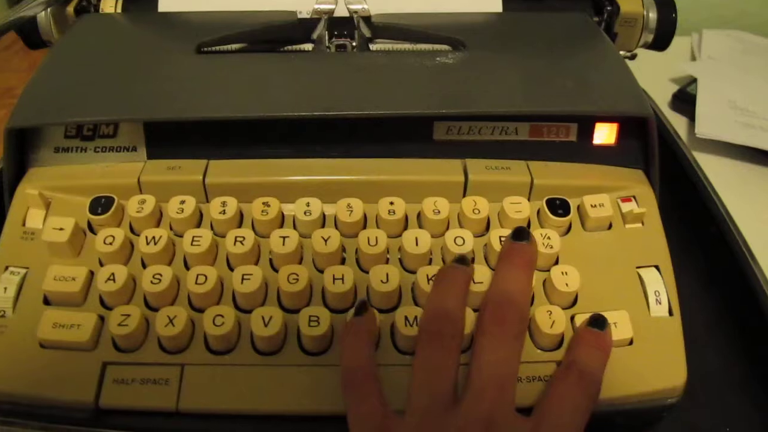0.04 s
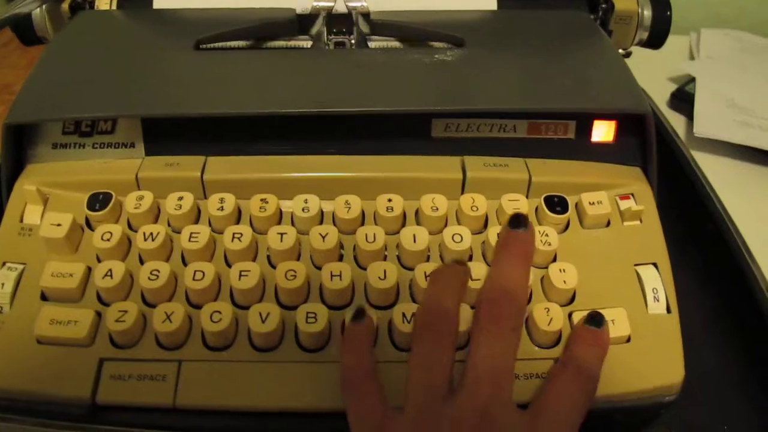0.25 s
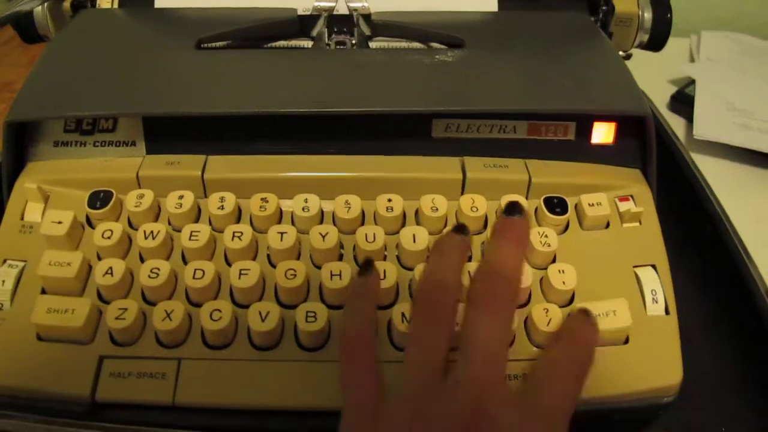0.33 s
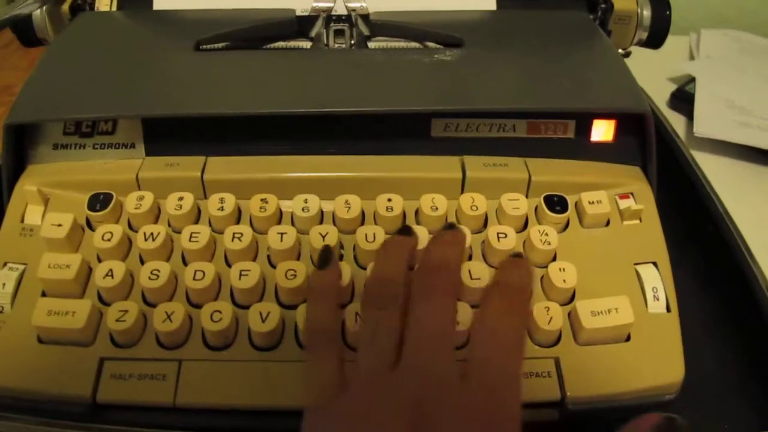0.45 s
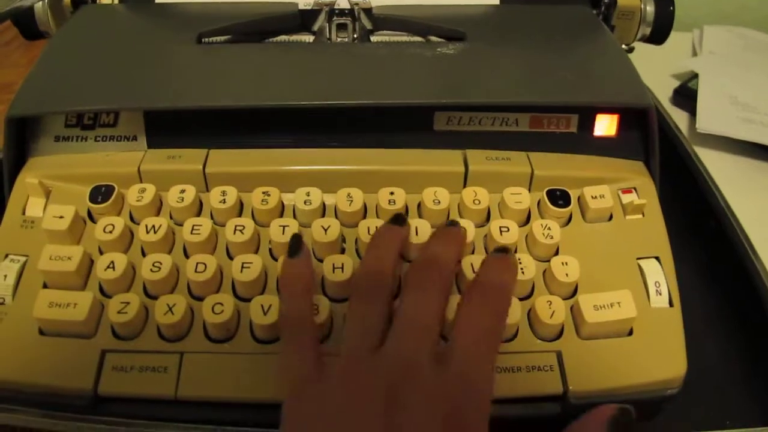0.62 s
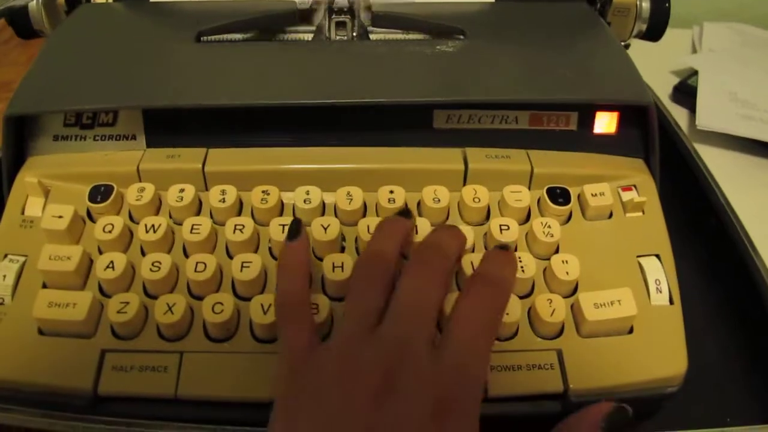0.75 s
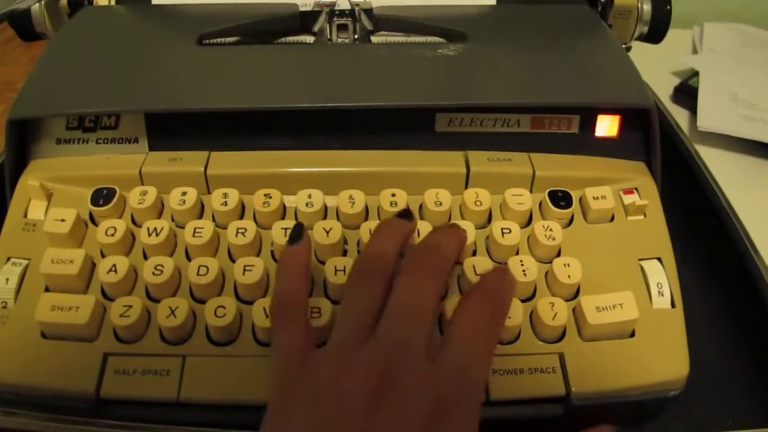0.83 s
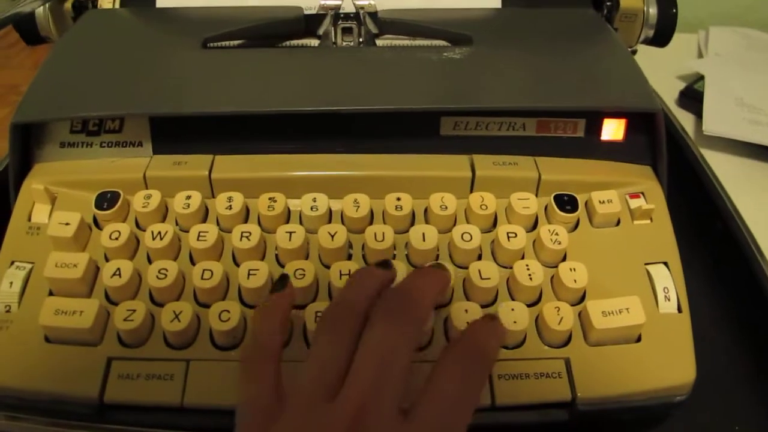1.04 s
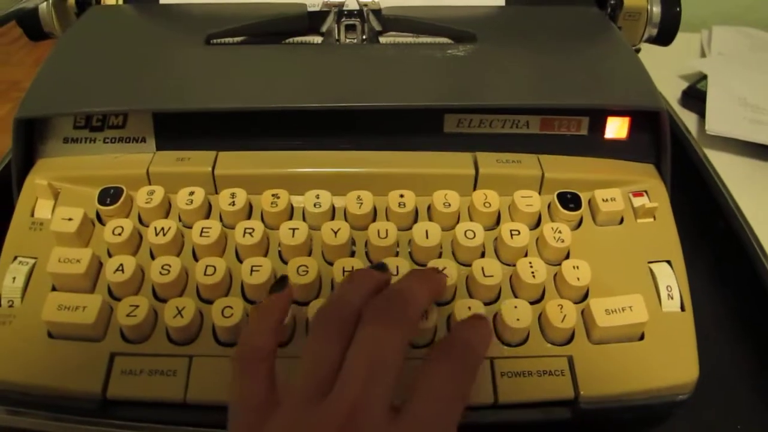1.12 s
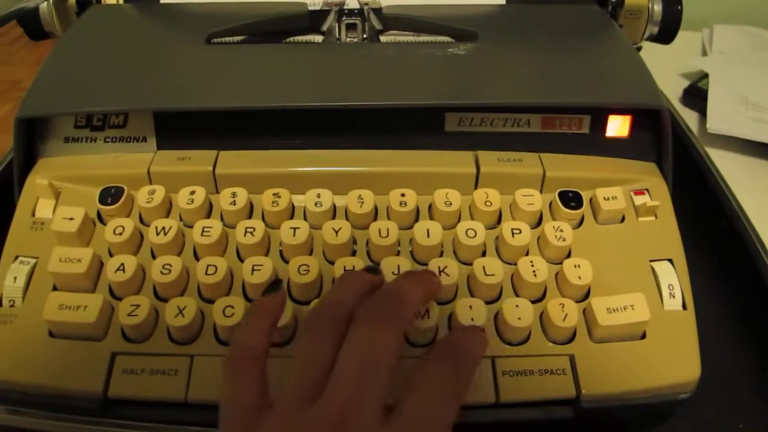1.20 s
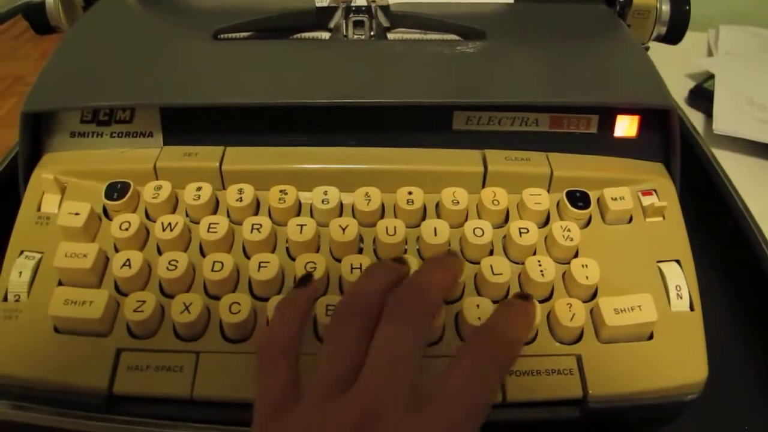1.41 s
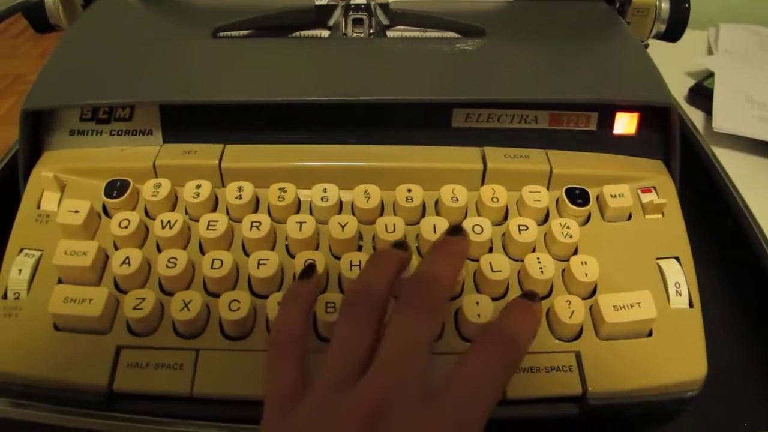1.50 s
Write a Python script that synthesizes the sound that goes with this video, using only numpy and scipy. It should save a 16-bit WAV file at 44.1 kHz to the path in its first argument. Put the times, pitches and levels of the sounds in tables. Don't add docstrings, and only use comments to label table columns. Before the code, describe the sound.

An electric typewriter hums as two letters crack sharply with a duller space bar clunk between

```python
import sys
import numpy as np
from scipy import signal
from scipy.fft import rfft, irfft
from scipy.io import wavfile
from scipy.ndimage import map_coordinates

SR = 44100
rng = np.random.default_rng(int(sys.argv[2]) if len(sys.argv) > 2 else 0)


def gain_from_db(level_db):
    decades = np.asarray(level_db, float) / 20
    return 10 ** decades


def transcribe(signal):
    frames = np.atleast_2d(signal).T
    limited = np.clip(frames, -1, 1)
    pcm = np.round(limited * 32767).astype(np.int16)
    wavfile.write(sys.argv[1], SR, pcm)


N = 68355

# (time [s], level [dB])
STRIKES = [
    (0.234, -1.5),
    (0.7613, -3),
]
# (frequency [Hz], level [dB], t60 [s])
FIRST_SLUG = [(894, -35.5, 0.021), (1850, -26.5, 0.011), (2540, -21, 0.0033), (3240, -14.5, 0.0051),
              (4620, -2.5, 0.0069), (5040, 0.5, 0.005), (5720, 1, 0.0074), (6730, -6, 0.0047),
              (7800, -6.5, 0.011), (9200, -14, .004), (12500, -14.5, 0.0033)]
# (frequency [Hz], level [dB], t60 [s])
SECOND_SLUG = [(881, -29.5, .02), (1800, -21, .012), (2450, -16.5, 0.01), (3510, -13, .006),
               (4500, -3, 0.0081), (4930, -4, 0.0078), (5440, -0.5, .007), (6370, -2.5, .006),
               (7720, -10.5, 0.013), (10600, -29, .004)]
SECOND_TOUCH_S, SECOND_TOUCH_DB = .001, -9.5
BOUNCE_S, BOUNCE_DB = .0074, -13.5
SLUG_LOW_HZ, BOUNCE_TOP_HZ = 700, 10000
SLUG_CONTACTS, SLUG_SPAN_S, BOUNCE_SPAN_S = 2, .0004, .0012


def type_bars():
    thin = signal.butter(2, SLUG_LOW_HZ, "high", fs=SR, output="sos")
    soft = signal.butter(4, BOUNCE_TOP_HZ, fs=SR, output="sos")
    out = np.zeros((2, N))
    for (s, db), slug in zip(STRIKES, (FIRST_SLUG, SECOND_SLUG)):
        touch_s = np.array([s, s + SECOND_TOUCH_S])
        touch_db = np.array([db, db + SECOND_TOUCH_DB]) - 2
        crack = contacts(touch_s, touch_db, SLUG_CONTACTS, SLUG_SPAN_S)
        out += signal.sosfilt(thin, strike(*crack, slug, spread_db=3, turn=1))
        bounce_s, bounce_db = np.array([s + BOUNCE_S]), np.array([db + BOUNCE_DB])
        bounce = contacts(bounce_s, bounce_db, TICK_CONTACTS, BOUNCE_SPAN_S)
        out += signal.sosfilt(soft, strike(*bounce, slug[3:9], spread_db=4))
    return out


# (time [s], level [dB], hold [s], t60 [s], bright share [0-1])
RATTLES = [(0.181, -50, 0.017, .03, 0.7), (.198, -27, 0.014, 0.018, 0), (0.212, -25, 0.017, .02, 0.5),
           (0.2268, -20, 0.011, .02, .8), (0.244, -35, .02, 0.29, 0.9), (0.277, -36.5, 0.0094, 0.16, 0.12),
           (0.3804, -32, 0.023, 0.086, 0.29), (0.417, -29.5, 0.0068, 0.25, 0.56),
           (0.438, -44, 0.0081, .15, 0), (0.704, -61, 0.017, .04, 0.07), (0.7241, -35.5, 0.022, 0.11, 0.11),
           (0.7541, -24.5, 0.008, 0.04, 0.88), (0.768, -31, 0.016, 0.13, 0.91),
           (0.801, -35, 0.014, 0.26, 0.4), (0.049, -50.5, 0.01, .05, 0.37), (0.068, -50, 0.008, 0.15, 0.45)]
# (frequency [Hz], density [dB per Hz])
DULL = [(120, -37.5), (200, -6), (647, -11), (1000, -1.5), (1480, -6), (3250, -5.5), (10000, -24),
        (16000, -43.5)]
# (frequency [Hz], density [dB per Hz])
BRIGHT = [(120, -35), (200, -5), (569, -10), (950, -14.5), (1680, -10), (5520, 7), (8000, 0),
          (10500, -16.5), (16000, -33.5)]
RATTLE_PER_S, RATTLE_SPREAD_DB, RATTLE_ATTACK_S = 13000, 1.28, 0.0013


def linkage():
    t = np.arange(N) / SR
    dull, bright = np.zeros(N), np.zeros(N)
    for s, db, hold, t60, share in RATTLES:
        attack = np.clip((t - s) / RATTLE_ATTACK_S, 0, 1)
        fall_db = 60 * np.clip(t - s - hold, 0, 9) / t60
        power = (gain_from_db(db - fall_db) * attack) ** 2
        dull += (1 - share) * power
        bright += share * power
    hits = rng.random((4, N)) < RATTLE_PER_S / SR
    sizes = gain_from_db(RATTLE_SPREAD_DB * rng.exponential(1, (4, N)))
    grains = hits * sizes * rng.choice([-1, 1], (4, N))
    lumps = gain_from_db(1.2 * drift(400))
    dull_part = np.sqrt(dull) * colour(grains[:2], DULL)
    bright_part = np.sqrt(bright) * colour(grains[2:], BRIGHT)
    return lumps * (dull_part + bright_part)


# (time [s], level [dB], bright share [dB])
KNOCKS = [(.048, -49.5, 2), (.0665, -49.5, 7), (.183, -46.5, 7.5), (.1983, -33, -3), (.2093, -35.5, -6),
          (.2135, -31.5, -2.5), (.2208, -29, -4), (.2262, -29.5, -2.5), (.3825, -37, -2),
          (.388, -33.5, -10.5), (.3918, -34.5, -2), (.402, -38, -7.5), (.4222, -32.5, 2), (.4245, -35.5, 0),
          (.4315, -38.5, -1.5), (.447, -36.5, 1), (.7033, -48, -6), (.709, -54.5, 1.5), (.716, -57.5, 1.5),
          (.7267, -37, -4.5), (.731, -36, -8.5), (.7545, -36.5, 1), (.78, -39, 0.5), (.787, -37.5, 0),
          (.807, -36, -4), (.818, -41.5, 0), (.844, -45.5, -1.5)]
# (frequency [Hz], level [dB], t60 [s])
LEVER = [(1050, -4.5, 0.0062), (1650, -3.5, 0.0082), (2330, -5.5, .007), (3200, -2, 0.0048),
         (4100, -4, .005)]
# (frequency [Hz], level [dB], t60 [s])
LEVER_TOP = [(5100, 0, .005), (6100, -1.5, .005), (7200, -2, .004), (8400, -5.5, .004), (10300, -12, .003),
             (12800, -20.5, .003)]


def levers():
    s, db, top_db = np.transpose(KNOCKS)
    body = contacts(s, db, SLUG_CONTACTS, BOUNCE_SPAN_S)
    top = contacts(s, db + top_db, SLUG_CONTACTS, BOUNCE_SPAN_S)
    return strike(*body, LEVER, spread_db=2) + strike(*top, LEVER_TOP, spread_db=3)


# (time [s], pitch [Hz])
RINGS = [(.199, 942), (.2, 2218), (.219, 3300), (.385, 1020), (.386, 2100), (.42, 1174), (.424, 7171),
         (.42, 5157), (.45, 8344), (.386, 4194), (.727, 1160), (.81, 14630), (.158, 7900), (.131, 8100),
         (.09, 1450), (.42, 5700), (.82, 366), (.045, 358), (.994, 6050), (1.0, 6500), (1.389, 6800),
         (.42, 4160)]
RING_DB = [-31, -29.5, -27, -35.5, -29, -38.5, -41, -60, -56, -29.5, -37, -59, -37.5, -47.5, -39.5, -27.5,
           -48.5, -45.5, -51, -60, -61, -56]
RING_T60_S = [0.1, .07, .025, 0.06, .03, .12, 0.4, 0.17, .4, 0.052, .04, 0.31, .02, 0.033, 0.044, .025,
              0.52, 0.32, 0.013, .1, .07, .5]


def ringing_parts():
    t, out = np.arange(N) / SR, np.zeros((2, N))
    for (s, hz), db, t60 in zip(RINGS, RING_DB, RING_T60_S):
        knock = np.zeros(N)
        knock[int(s * SR)] = gain_from_db(db)
        swell = np.clip((t - s) / RATTLE_ATTACK_S, 0, 1) * gain_from_db(drift(60))
        out += ring(knock, hz, t60) * swell * [[1], [.6]]
    return out


# (time [s], level [dB])
THUMPS = [
    (0.116, -45.5),
    (0.279, -42),
    (0.385, -33.5),
    (0.401, -30),
    (.419, -32),
    (.433, -38.5),
    (.446, -34.5),
    (.47, -38),
    (0.799, -41),
    (.85, -42),
]
# (frequency [Hz], level [dB], t60 [s])
CASE = [(127.5, -3, 0.4), (180, -0.5, .13), (236, -2.5, 0.075), (339.4, -4, .1), (469, -2, .1),
        (695, -3, 0.09), (800, -6.5, 0.066)]


def case():
    s, db = np.transpose(THUMPS)
    return signal.lfilter([.08], [1, -.92], strike(s, db - 4, CASE, spread_db=4))


# (time [s], peak level [dB], treble share [dB])
TICKS = [(.54, -48, -1), (.564, -44.5, -10), (.618, -61, -2), (.993, -64.5, 11), (1.023, -46.5, -14),
         (1.055, -49, -26), (1.0745, -55.5, -14.5), (1.128, -62, -3.5), (1.473, -54.5, -15.5),
         (1.118, -57.5, -10), (1.164, -44, -10.5), (1.177, -51, -10), (1.23, -52, -31), (1.288, -47, -16),
         (1.322, -46.5, -16.5), (1.373, -40, -13), (1.393, -41.5, -21.5), (1.428, -50, -30),
         (1.514, -42, -10.5)]
# (frequency [Hz], level [dB], t60 [s])
ROLLER = [(819, -8, 0.041), (970, -11, 0.024), (1224, -9, 0.044), (1457, -2, 0.022), (2476, -9.5, 0.008),
          (3196, -11, 0.0058)]
# (frequency [Hz], level [dB], t60 [s])
ROLLER_TOP = [(3900, 2, .005), (4900, 5.5, .005), (5900, 0.5, .005), (6800, 1, 0.0054), (7440, 5, .005),
              (8300, 1, .012), (9700, -6, .004), (11800, -22, .003)]
TICK_CONTACTS, TICK_SPAN_S = 8, .004


def roller():
    s, db, top_db = np.transpose(TICKS)
    body = contacts(s, db - 1.5, TICK_CONTACTS, TICK_SPAN_S)
    top = contacts(s, db + top_db - 6, TICK_CONTACTS, TICK_SPAN_S)
    return strike(*body, ROLLER, spread_db=2.5) + strike(*top, ROLLER_TOP, spread_db=2.5)


# (multiple of the hum [1], level [dB])
HUM = [(1, -46.5), (2.03, -55), (3, -61), (3.5, -64.5), (7, -71)]
# (time [s], level [dB])
HUM_SWELL = [(0, -1.5), (.09, -0.5), (.135, 4.5), (.17, -4.5), (.6, -0.5), (.95, -0.5), (1.1, 2), (1.55, 0)]
# (time [s], level [dB])
BUZZ = [(0, -53.5), (.19, -50), (.6, -62), (1.3, -56), (1.45, -55)]
# (frequency [Hz], density [dB per Hz])
WHIR = [(15, -50), (30, -41.5), (123, -4.5), (190, -15), (400, -13.5), (624, -23.5), (850, -17.5),
        (1440, -22.5), (1850, -28.5), (7900, -39), (9500, -48.5), (16000, -56.5)]
HUM_HZ, HUM_WOBBLE_DB, WHIR_DB = 120, 1.0, -46.5
BUZZ_HZ, BUZZ_T60_S, BUZZ_UNEVEN_DB = 2480, .03, 3.5


def motor():
    phase = 2 * np.pi * HUM_HZ * np.arange(N) / SR
    hum = np.zeros(N)
    for k, db in HUM:
        level = np.sqrt(2) * gain_from_db(db + HUM_WOBBLE_DB * k * drift(15))
        wander = rng.uniform(0, 6) + 0.14 * k ** .5 * drift(11)
        hum += level * np.sin(k * phase + wander)
    cycles = np.arange(.0002, N / SR - .01, 1 / HUM_HZ)
    taps = cycles + rng.uniform(0, .003, len(cycles))
    plate = [(BUZZ_HZ, 0, BUZZ_T60_S), (1.1 * BUZZ_HZ, -5, BUZZ_T60_S)]
    buzz = strike(taps, np.zeros(len(taps)), plate, spread_db=BUZZ_UNEVEN_DB) * in_time(BUZZ)
    whir_db = WHIR_DB + .8 * drift(15) + 1.5 * drift(150) + 1.2 * np.cos(phase)
    whir = colour(rng.standard_normal((2, N)), WHIR) * gain_from_db(whir_db)
    return hum * in_time(HUM_SWELL) * [[1], [.8]] + buzz + whir


# (time [s], level [dB])
RUMBLE = [(0, -67), (.2, -60.5), (.33, -58.5), (.55, -50.5), (.7, -73), (.85, -51.5), (1.0, -61.5),
          (1.15, -88.5), (1.55, -73.5)]
RUMBLE_HZ = 89


def rumble():
    band = signal.butter(2, [RUMBLE_HZ / 2, RUMBLE_HZ], "band", fs=SR, output="sos")
    low = signal.sosfilt(band, rng.standard_normal((2, N)))
    return rms_one(low) * in_time(RUMBLE)


ROOM_DB, ROOM_T60_S, ROOM_GAP_S = -18.5, .3, 0.0037


def room(x):
    t = np.arange(SR // 2) / SR
    build_up = np.clip(t / ROOM_GAP_S - 1, 0, 1)
    echo = rng.standard_normal((2, len(t))) * gain_from_db(-60 * t / ROOM_T60_S) * build_up
    echo = signal.lfilter([1], [1, -.3], echo)
    echo /= np.sqrt(np.sum(echo[0] ** 2))
    return gain_from_db(ROOM_DB) * signal.fftconvolve(x[None], echo, axes=1)[:, :N]


# (time [s], gain [dB])
DUCKS = [
    (.234, -3),
    (.42, -10),
    (.761, -15.5),
]
RECOVER_DB_PER_S, DUCK_S = 12, .01


def recorder_gain():
    t = np.arange(N) / SR
    curves = []
    for s, low_db in DUCKS:
        climb = np.minimum(low_db + RECOVER_DB_PER_S * (t - s), 0)
        curves.append(np.where(t > s, climb, 0))
    r = np.exp(-1 / (DUCK_S * SR))
    return gain_from_db(signal.lfilter([1 - r], [1, -r], np.min(curves, axis=0)))


# (frequency [Hz], likeness [0-1])
LIKENESS = [(60, 0.98), (150, 1), (1000, 0.93), (2800, 0.69), (5600, 0.76), (9500, .1), (15000, 0.05)]
# (frequency [Hz], left minus right [dB])
SIDES = [(60, -0.5), (2800, 0), (5200, 6), (6800, -8.5), (8300, -10.5), (12000, -5)]
LEFT_LAG_S = 3.3e-5


def ports(pair):
    hz = np.fft.rfftfreq(N, 1 / SR)
    alike = np.sqrt(np.clip(at_hz(LIKENESS, hz), 0, 1))
    common, other = rfft(pair) * np.sqrt([(1 + alike) / 2, (1 - alike) / 2])
    lean = gain_from_db(at_hz(SIDES, hz) / 2) * np.exp(-1j * np.pi * hz * LEFT_LAG_S)
    return irfft([(common + other) * lean, (common - other) / lean], N)


def contacts(s, db, count, span):
    late = rng.exponential(1, (len(s), count)) * (np.arange(count) > 0)
    times = s[:, None] + span * late
    levels = db[:, None] - 6.8 * late - 3.4 * (late > 0)
    return times.ravel(), levels.ravel()


def strike(s, db, modes, spread_db, turn=-1):
    out = np.zeros((2, N))
    at = np.minimum(np.asarray(s) * SR, N - 1).astype(int)
    chance = rng.standard_normal((len(at), len(modes), 2))
    for k, (hz, level_db, t60) in enumerate(modes):
        clicks = np.zeros((2, N))
        np.add.at(clicks[0], at, gain_from_db(db + level_db + spread_db * chance[:, k, 0]))
        np.add.at(clicks[1], at, gain_from_db(db + level_db) * chance[:, k, 1])
        out += ring(clicks, hz, t60) * turn ** k
    return out


def ring(clicks, hz, t60):
    r, w = gain_from_db(-60 / (t60 * SR)), 2 * np.pi * hz / SR
    return signal.lfilter([0, np.sin(w)], [1, -2 * r * np.cos(w), r * r], clicks + 1e-18)


def colour(x, spectrum):
    hz = np.fft.rfftfreq(N, 1 / SR)
    return rms_one(irfft(rfft(x) * gain_from_db(at_hz(spectrum, hz)), N))


def drift(rate):
    knots = rng.standard_normal(int(rate * N / SR) + 4)
    return rms_one(map_coordinates(knots, [np.arange(N) * rate / SR + 1], order=3))


def rms_one(x):
    return x / np.sqrt(np.mean(x ** 2) + 1e-20)


def at_hz(points, hz):
    p = np.array(points)
    return np.interp(np.log(hz + 1), np.log(p[:, 0]), p[:, 1])


def in_time(rows):
    s, db = np.transpose(rows)
    return gain_from_db(np.interp(np.arange(N) / SR, s, db))


REST_TOP_HZ = 16550


def scene():
    cracks = type_bars()
    works = linkage() + levers() + ringing_parts() + case() + roller()
    rest = works + room((cracks + works)[0]) + recorder_gain() * motor() + rumble()
    top = signal.cheby2(14, 70, REST_TOP_HZ, fs=SR, output="sos")
    return ports(cracks + signal.sosfilt(top, rest))


def low_pass(x):
    return signal.sosfilt(signal.butter(12, 21850, fs=SR, output="sos"), x)


def record(dry):
    mix = np.clip(dry, -1, 1)
    return low_pass(mix)


dry = scene()
out = record(dry)
transcribe(out)
```